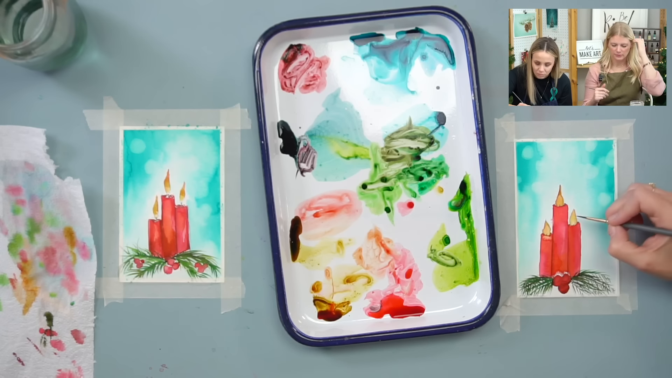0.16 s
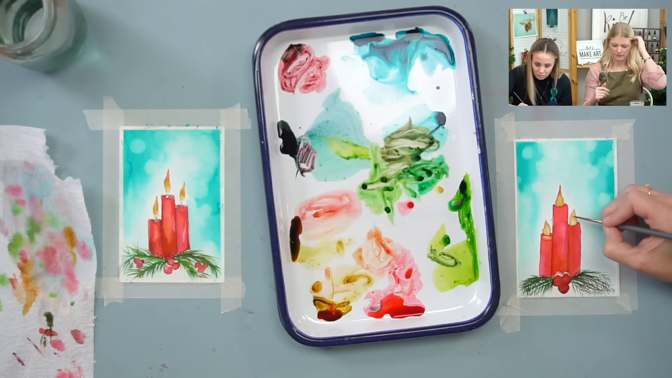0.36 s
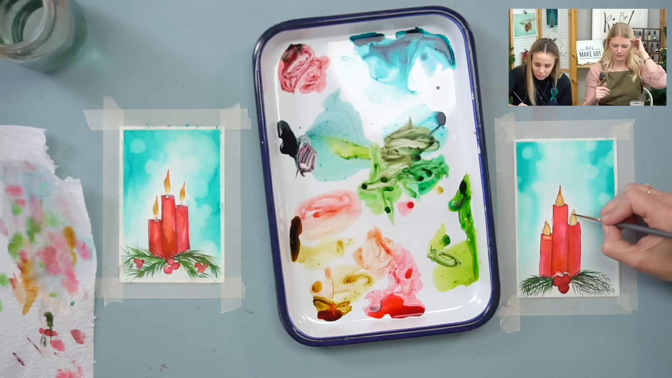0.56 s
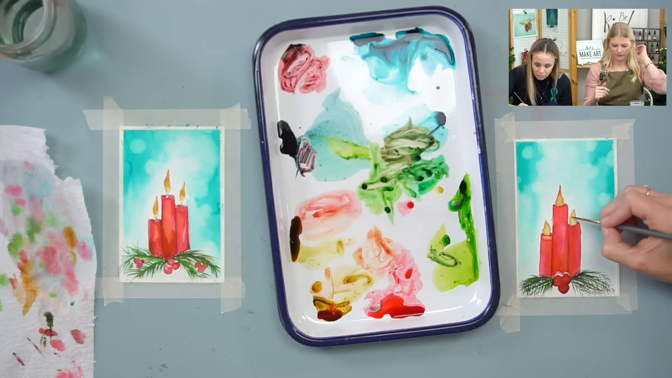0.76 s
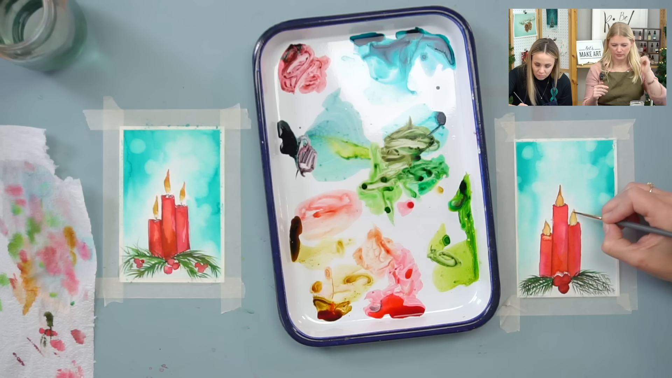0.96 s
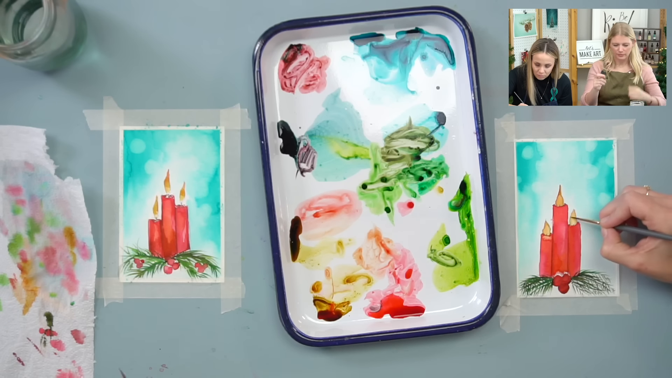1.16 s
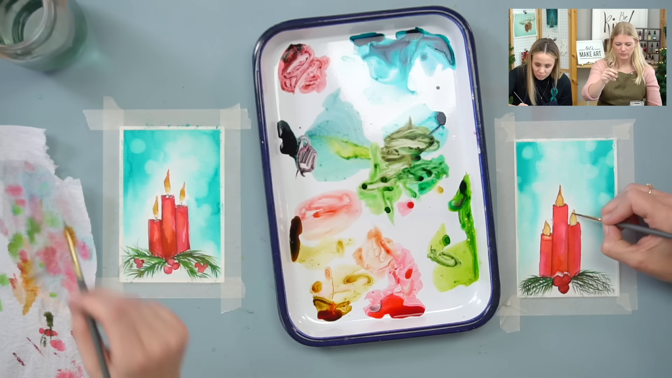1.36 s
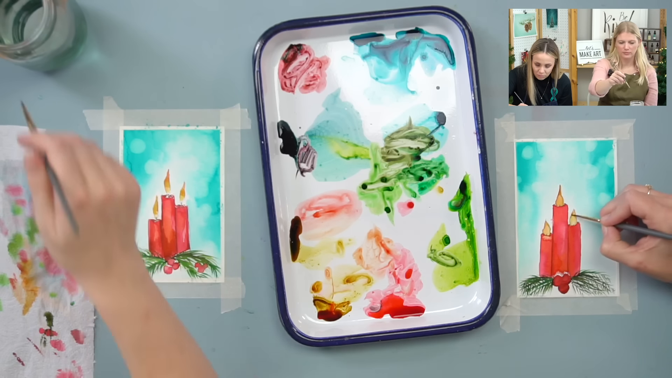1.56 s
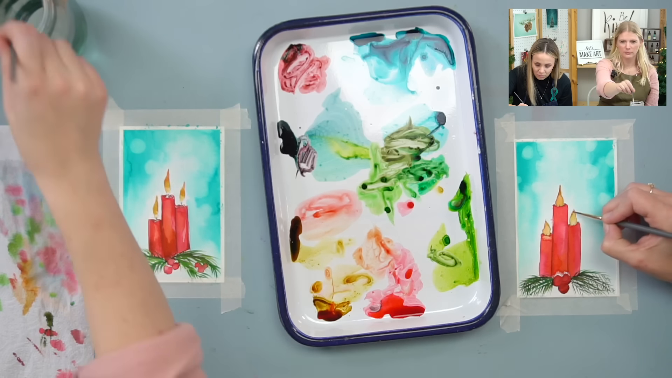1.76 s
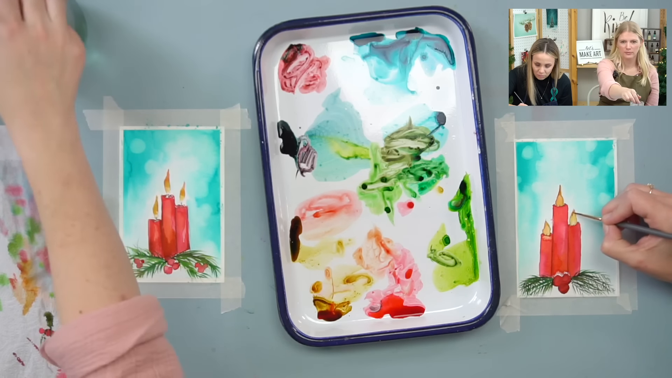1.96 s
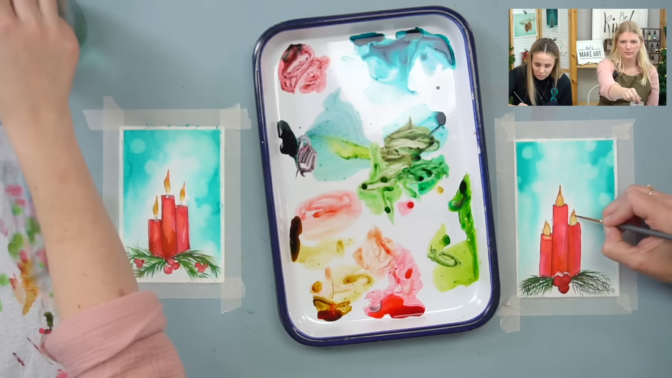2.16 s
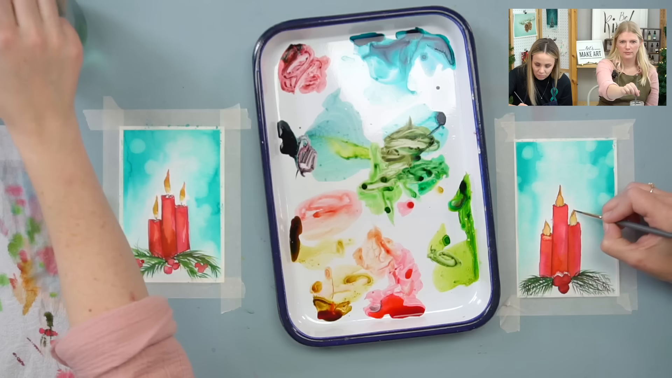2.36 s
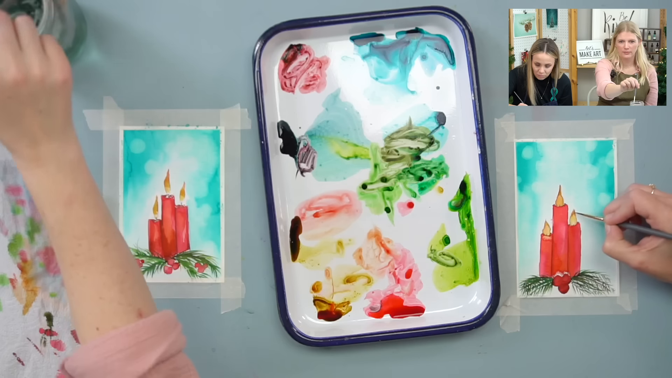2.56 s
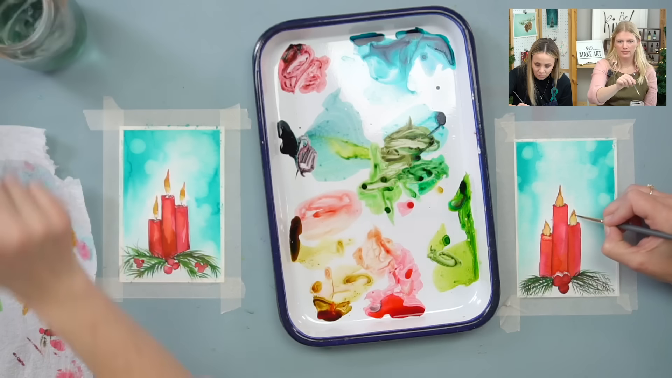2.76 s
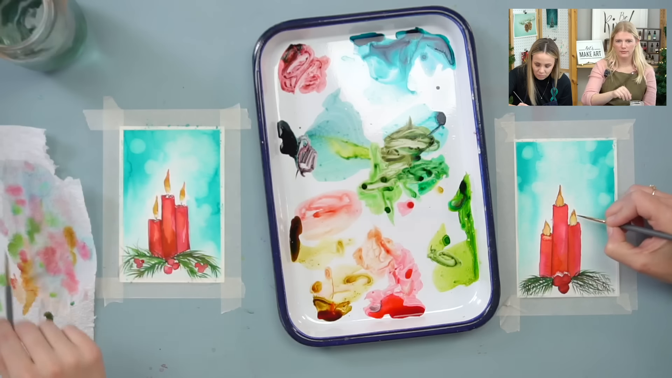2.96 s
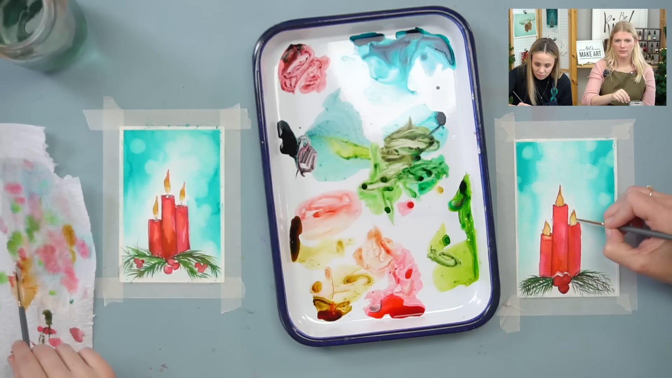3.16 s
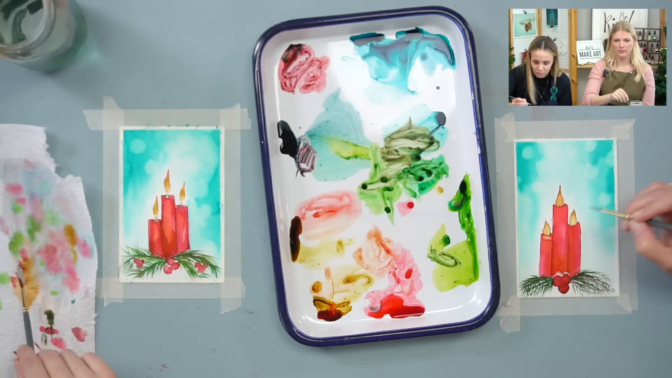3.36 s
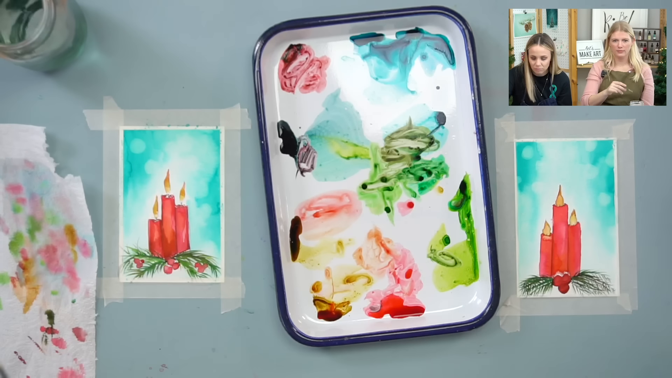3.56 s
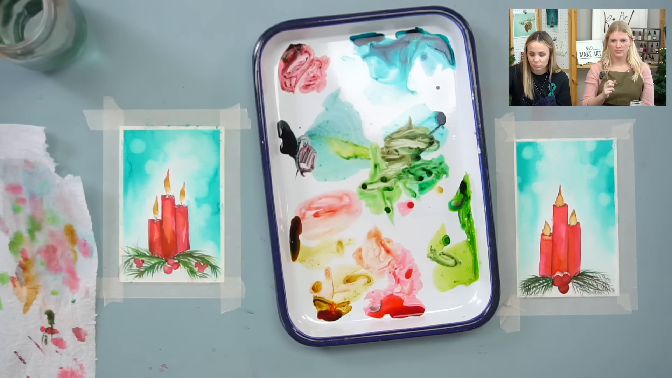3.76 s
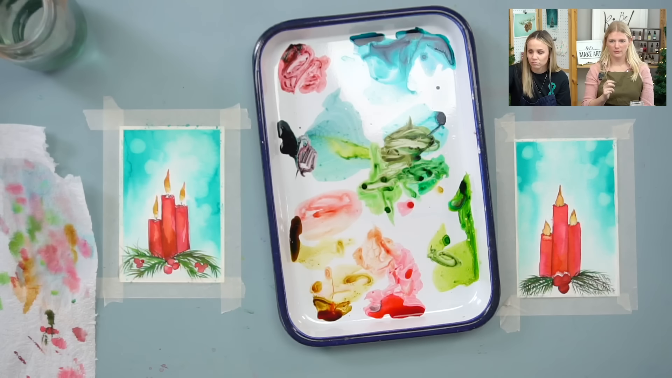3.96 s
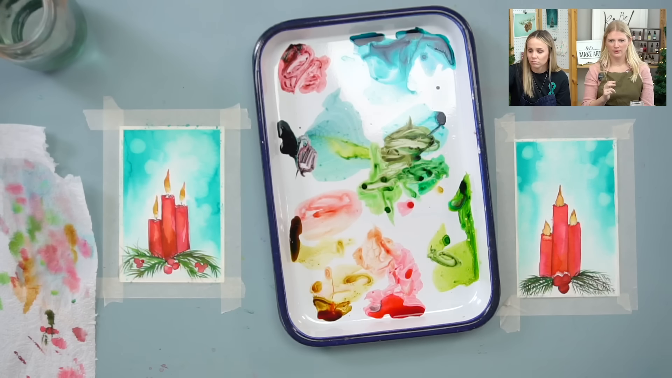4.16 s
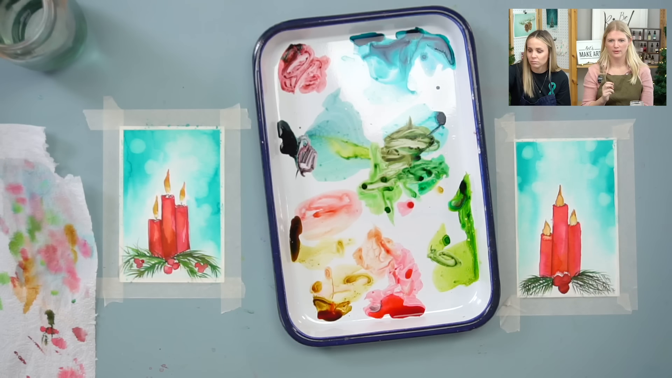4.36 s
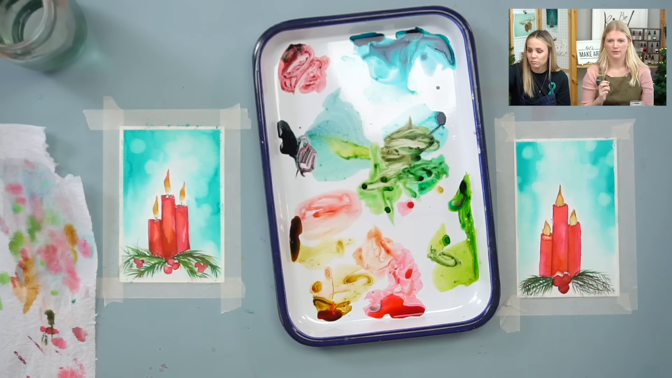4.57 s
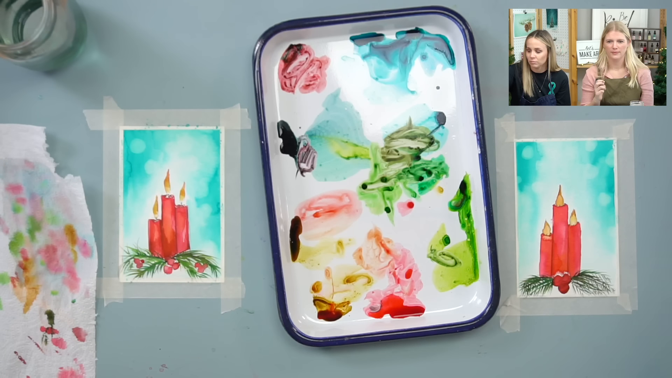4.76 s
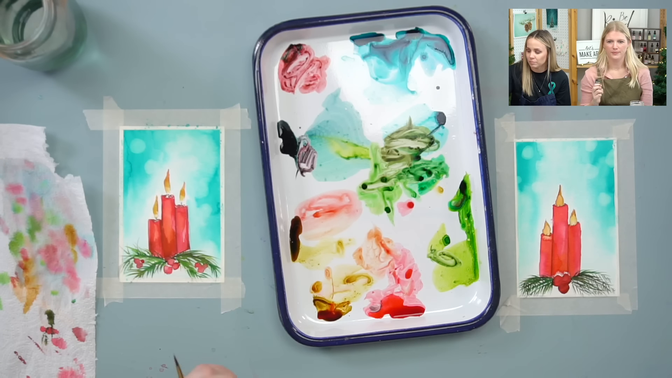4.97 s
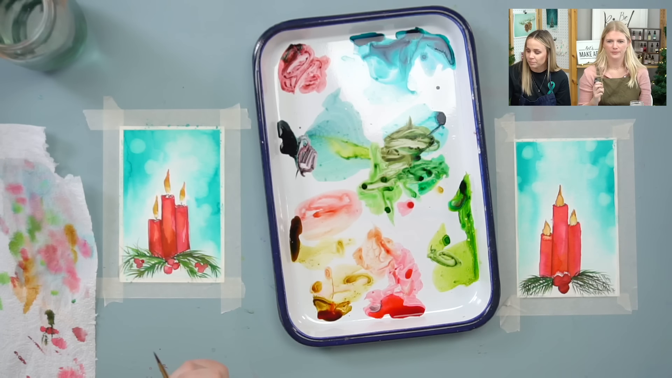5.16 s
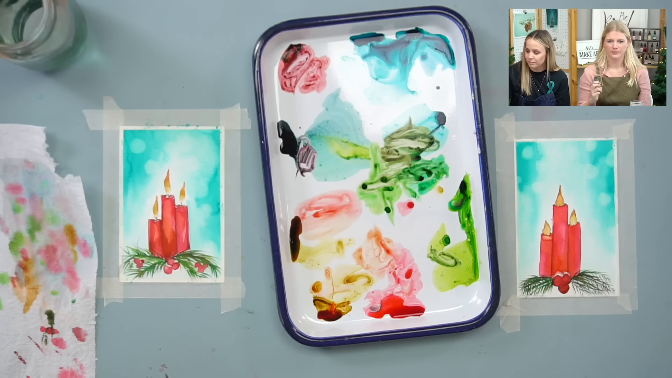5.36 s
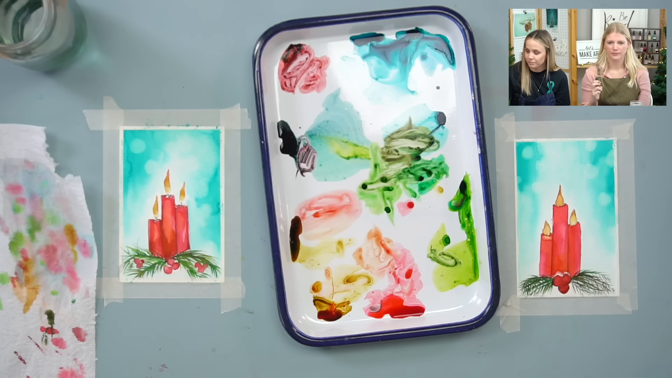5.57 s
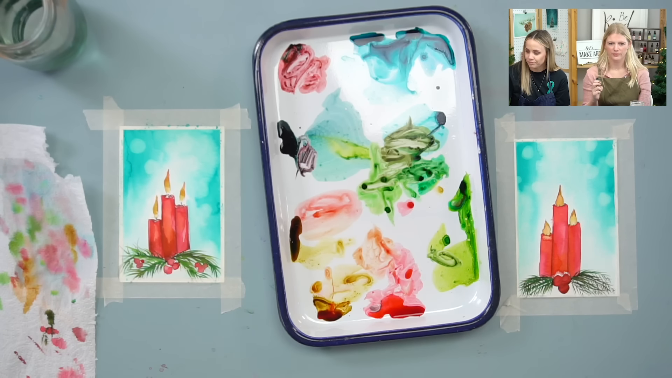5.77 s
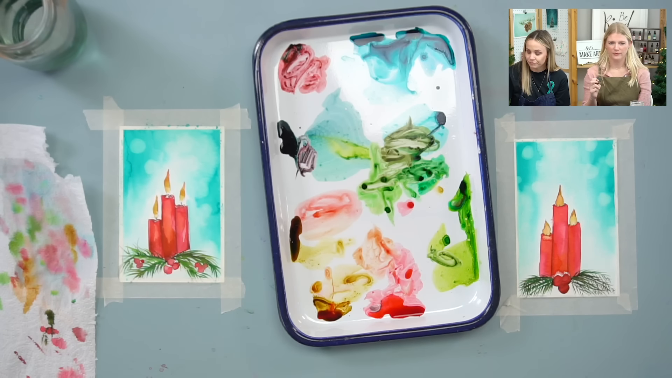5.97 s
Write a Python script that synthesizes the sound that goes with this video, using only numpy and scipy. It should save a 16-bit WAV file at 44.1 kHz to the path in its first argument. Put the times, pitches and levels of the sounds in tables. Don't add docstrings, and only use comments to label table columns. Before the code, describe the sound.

Quiet ventilation hum in a small furnished room. Sleeves and a paper towel rustle, with small crease snaps and low thuds of cloth on a close clip-on microphone. Near two seconds a brush raps a glass water jar three times: a bright rim clink, a duller, wetter knock under water, then another bright clink. More rustles and bumps follow, with a faint little tick later.

```python
import sys
import numpy as np
from scipy import signal
from scipy.fft import rfft, irfft, next_fast_len
from scipy.io import wavfile
from scipy.ndimage import map_coordinates

SR = 44100
rng = np.random.default_rng(int(sys.argv[2]) if len(sys.argv) > 2 else 0)


def invert_db(x):
    u = np.asarray(x, float) / 20
    return 10 ** u


def transcribe(u):
    v = np.clip(np.atleast_2d(u).T, -1, 1)
    q = np.round(v * 32767).astype(np.int16)
    wavfile.write(sys.argv[1], SR, q)


N = 265570

# f/Hz, level/dB
PAPER_SPECTRUM = [(1200, -13), (2500, -3), (4500, -1.5), (7000, -6.5), (11000, -15), (16000, -26)]


def jar_blows():
    rim_hz = [2729, 2815, 2878, 3779, 3953, 4388, 4582, 5265, 5412, 5479, 6300, 7644, 8271, 8360, 8905,
              9038, 9620, 9795, 10690, 10925, 11363, 12089, 12400, 12908, 13200, 13995, 14242, 14688, 15010,
              15710]
    # t60/s, level at first rim blow/dB, level at second rim blow/dB
    rim_rings = [(0.49, -18.5, -30.5), (0.44, -21, -30), (0.34, -36, -33.5), (0.2, -22.5, -31.5),
                 (0.37, -59, -54), (0.25, -18, -33.5), (0.3, -33.5, -45), (0.39, -60, -34),
                 (0.46, -37.5, -29.5), (0.19, -26.5, -18), (0.18, -45, -41), (0.32, -46.5, -47),
                 (0.2, -33.5, -39), (0.13, -29.5, -52), (0.21, -36, -24), (0.11, -20, -20),
                 (0.25, -42, -38), (0.14, -36, -54), (0.22, -48.5, -41), (0.22, -51, -36), (0.19, -60, -35),
                 (0.15, -37, -27), (0.16, -39, -33), (0.1, -41, -38), (0.12, -29.5, -38), (0.15, -59, -44),
                 (0.22, -61, -47), (0.22, -52, -57), (0.19, -61, -45), (0.16, -58, -55)]
    wall_hz = [2765, 3395, 3490, 3885, 3980, 4026, 4674, 5305, 5500, 7235, 7360, 7573, 7813, 8106, 8355,
               8930, 9085, 9800, 10400, 11250, 11400, 12294, 12600, 13050, 14810, 15040, 15365, 15710]
    # t60/s, level/dB
    wall_rings = [(0.33, -35), (0.18, -55), (0.39, -55), (0.25, -45), (0.22, -33), (0.11, -20.5),
                  (0.26, -35.5), (0.16, -38), (0.14, -30), (0.24, -49), (0.17, -29), (0.28, -53),
                  (0.11, -34), (0.215, -48), (0.14, -39), (0.28, -55), (0.19, -37), (0.22, -51),
                  (0.12, -59), (0.14, -44), (0.11, -53), (0.099, -52), (0.21, -58), (0.2, -66), (0.3, -65),
                  (0.22, -58), (0.23, -58), (0.11, -54)]
    # t/s, crack/dB, shimmer/dB, shimmer tilt/dB per octave, flutter/dB, fade curvature/1
    blows = [
        (1.8736, -21.5, -34, 3, 3, 1.2),
        (2.1394, -26, -31, -5, 5.5, 0.95),
        (2.487, -20, -33.5, 7, 6, 0.84),
    ]
    # f/Hz, level/dB
    crack_spectrum = [(600, -34), (1500, -20), (2500, -1.5), (4000, 9.5), (6500, -7), (9000, -7),
                      (13000, -8), (16000, -21)]

    out = np.zeros(N)
    t = np.arange(SR // 2) / SR
    rim = np.column_stack([rim_hz, rim_rings])
    wall = np.column_stack([wall_hz, wall_rings])
    struck = [rim[:, [0, 1, 2]], wall, rim[:, [0, 1, 3]]]
    next_s = [blow[0] for blow in blows[1:]] + [N / SR]
    for modes, blow, end in zip(struck, blows, next_s):
        s, crack_db, shimmer_db, tilt_db, depth_db, bend = blow
        glass = np.zeros(len(t))
        for hz, t60, db in modes:
            glass += ring(hz, db - 1.0, t60, 0.00045, bend) * flutter(depth_db, rate=59.3)
        glass *= invert_db(-60 * np.maximum(t + s - end, 0) / 0.05)
        glass += shimmer(shimmer_db - 13, tilt_db, count=170)
        crack = coloured(rng.standard_normal(len(t)), crack_spectrum)
        glass += invert_db(crack_db - 60 * t / 0.028) * crack
        add(out, s, glass)
        add(out, s, invert_db(-9) * room_tail(glass))
    return out


def flutter(depth_db, rate):
    knots = rng.standard_normal(int(rate / 2) + 4)
    t = np.arange(SR // 2) / SR
    onset = np.tanh(t / 0.0078)
    return invert_db(depth_db * onset * map_coordinates(knots, [t * rate]))


def shimmer(db, tilt_db, count):
    place, size, life = rng.random((count, 3)).T
    hz = 3100 + 12700 * (np.arange(count) + place) / count
    octaves = np.log2(hz / 6000)
    t60 = 0.28 * invert_db(-3.5 * octaves + 4.9 * (life - 1.5))
    gap_db = 8 * np.exp(-((hz - 6500) / 700) ** 2)
    level_db = db + tilt_db * octaves - gap_db - 17 * size
    return sum(ring(*mode, attack=0.00071) for mode in zip(hz, level_db, t60))


def brush_pings():
    # t/s, f/Hz, level/dB, t60/s
    pings = [(2.141, 775, -34, 0.045), (2.158, 770, -29.5, 0.031), (2.16, 1117, -36.5, 0.064),
             (2.487, 823, -32, 0.042), (4.46, 7100, -66, 0.18), (4.469, 1445, -34.5, 0.028),
             (4.471, 4380, -43, .15), (4.4926, 4450, -34, 0.094), (4.493, 5250, -51, .1),
             (2.1398, 3320, -27, 0.04), (2.4872, 3690, -33, 0.033), (2.634, 7500, -46, .01),
             (4.672, 4770, -42, 0.033), (4.678, 4380, -47, 0.055), (4.848, 6030, -37.5, 0.018),
             (1.795, 2750, -50, 0.048), (2.38, 2860, -58, .05), (5.378, 2730, -56, 0.035)]
    out = np.zeros(N)
    for s, hz, db, t60 in pings:
        ping = ring(hz, db, t60, attack=0.00047) * flutter(2.3, rate=220)
        add(out, s, ping)
        add(out, s, invert_db(-17) * room_tail(ping))
    return out


def sleeves_and_towel():
    # t of full speed/s, rise/s, hold/s, fall/s, sleeve rustle/dB
    moves = [(0.0, .1, 0.0092, .12, -57), (1.29, 0.22, 0.15, 0.45, -54.5), (1.9, 0.37, 0.3, 0.35, -55.5),
             (2.651, 0.055, 0.19, 0.29, -48.5), (3.2, .2, 0.22, 0.38, -65), (3.563, 0.12, 0.21, 0.18, -54),
             (4.203, 0.097, 0.18, 0.38, -61), (4.473, 0.13, 0.24, 0.17, -51.5),
             (4.88, 0.075, 0.039, 0.27, -57.5), (5.595, .3, .25, 0.24, -62), (5.98, 0.077, .04, .1, -60)]
    # t/s, fizz/dB
    towel_shifts = [
        (.36, -61),
        (1.7, -64),
        (2.84, -56),
        (5.8, -72),
    ]
    # f/Hz, level/dB per Hz
    sleeve_spectrum = [(300, -35), (550, -2), (1200, -5.5), (2000, -13), (3500, -17), (8000, -35),
                       (16000, -46)]
    rest_db = -67.5
    towel_s = 0.21

    rustle_db = swells(rest_db, moves)
    rustle = invert_db(rustle_db)
    fizz_db = -67.5 + 0.72 * (rustle_db - rest_db)
    fizz = invert_db(swells(fizz_db, [(s, towel_s, 0, towel_s, db) for s, db in towel_shifts]))
    slips = invert_db(1.27 * wobble(30) + 1.5 * wobble(400))
    out = invert_db(1.5) * rustle * coloured(slips * rng.standard_normal(N), sleeve_spectrum)
    out += invert_db(-1.5) * fizz * coloured(slips * rng.standard_normal(N), PAPER_SPECTRUM)
    for hz, db in [(500, 16.2), (1300, 6.8)]:
        happens = rng.random(N) < 60 / SR
        kicks = happens * np.tanh(rng.exponential(size=N) / 2) * 2
        out += invert_db(db) * rustle * signal.fftconvolve(kicks, pop(hz))[:N]
    return out


def crease_snaps():
    # t/s, peak/dB, crackle relative to it/dB
    snaps = [(1.008, -49, -6), (1.082, -52, -1), (1.282, -42, -17), (1.375, -34, -11.5), (1.436, -41, -7),
             (1.456, -33.5, -11), (1.511, -33, -24), (1.584, -43, -15), (1.623, -33, -14.5),
             (2.014, -35, -8), (2.148, -40, -14), (2.379, -36, -16), (2.621, -29, -20), (2.634, -43, -13),
             (2.663, -37, -23), (2.677, -25.5, -22), (2.7, -33, -8), (2.888, -34, -16), (2.92, -39, -9),
             (2.981, -45, -25), (3.179, -48, -19), (3.193, -38.5, -22), (3.697, -36, -23),
             (3.699, -30.5, -26), (3.724, -42, -15), (4.468, -36, -23), (4.571, -32, -20),
             (4.891, -34, -21), (4.938, -40, -13), (5.762, -48, -10.5)]
    out = np.zeros(N)
    t = np.arange(2048) / SR
    for s, db, crackle_db in snaps:
        add(out, s + 0.001025, invert_db(db + 2.5) * pop(1440))
        crackle = coloured(rng.standard_normal(len(t)), PAPER_SPECTRUM)
        add(out, s + 0.000977, invert_db(db + crackle_db - 60 * t / 0.023) * crackle)
    return out


def pop(hz):
    u = 2 * np.pi * hz * np.arange(512) / SR
    return 3 * u ** 2 * (1 - u / 3) * np.exp(-u)


def microphone_bumps():
    # t/s, peak/dB, f/Hz
    bumps = [
        (1.455, -23, 182),
        (1.485, -28, 213),
        (1.547, -27, 310),
        (2.98, -22, 210),
        (3.173, -22, 265),
        (3.694, -22, 360),
        (3.767, -43, 172),
        (4.93, -27.5, 175),
    ]
    out = np.zeros(N)
    for s, db, hz in bumps:
        add(out, s + 0.00312, ring(hz, db - 1, t60=0.017, attack=0.0012))
    return out


def microphone_rub():
    # t/s, rumble/dB
    leans = [
        (0.0, -34),
        (1.38, -37.5),
        (2.87, -36.5),
        (3.7, -39.5),
        (4.65, -46),
        (5.62, -42.5),
    ]
    # f/Hz, level/dB per Hz
    rub_spectrum = [(24, -62), (40, -35), (68, 0), (113, 1.5), (151, 0.5), (593, -10.5), (900, -20),
                    (1170, -32), (1980, -120)]
    lean_s, rest_db = 0.16, -44
    rumble = invert_db(swells(rest_db, [(s, lean_s, 0, lean_s, db) for s, db in leans]))
    grains = invert_db(1.65 * wobble(25)) * rng.standard_normal(N)
    return invert_db(-8.5) * rumble * coloured(grains, rub_spectrum)


def ventilation():
    # f/Hz, level/dB per Hz
    air_spectrum = [(26, -48), (45, -7), (123, 0), (146, -8.5), (177, -9), (296, -5.5), (397, -8),
                    (533, -10), (632, -25), (828, -24.5), (1290, -32.5), (1450, -35.5), (15600, -41)]
    # f/Hz, width/Hz, level/dB
    ducts = [(93, 6.2, -56.5), (119.6, 5.1, -55), (175, 11.3, -54.5), (328.7, 37, -59)]
    out = invert_db(-49.5) * coloured(rng.standard_normal(N), air_spectrum)
    for centre, width, db in ducts:
        hum = filtered(rng.standard_normal(N), lambda hz: 1 / (1 + ((hz - centre) / width) ** 2))
        out += invert_db(db) * unit(hum)
    return out


def room_tail(x):
    # f/Hz, t60/s
    decay = [(300, 0.74), (3000, 0.37), (12000, 0.23)]
    hz, t, z = signal.stft(rng.standard_normal(SR // 2), SR, nperseg=256)
    fade = invert_db(-60 * t / along(decay, hz)[:, None])
    tail = signal.istft(z * fade, SR, nperseg=256)[1]
    late = np.pad(x, (250, 0))
    return signal.fftconvolve(late, tail / np.linalg.norm(tail))


def ring(hz, db, t60, attack, bend=1):
    t = np.arange(SR // 2) / SR
    fade = invert_db(db - 60 * (t / t60) ** bend)
    return fade * np.sin(2 * np.pi * hz * t) * (1 - np.exp(-t / attack))


def swells(rest_db, rows):
    t = np.arange(N) / SR
    power = invert_db(rest_db) ** 2
    for s, rise, hold, fall, db in rows:
        away = np.maximum((s - t) / rise, (t - s - hold) / fall)
        power = power + invert_db(db - 10 * np.maximum(away, 0)) ** 2
    return 10 * np.log10(power)


def wobble(rate):
    knots = rng.standard_normal(int(N * rate / SR) + 4)
    return map_coordinates(knots, [np.arange(N) * rate / SR])


def unit(x):
    return x / np.sqrt(np.mean(x ** 2) + 1e-20)


def along(points, hz):
    f, v = np.transpose(points)
    return np.interp(np.log(hz + 1), np.log(f + 1), v)


def filtered(x, response):
    m = next_fast_len(len(x) + 8192)
    return irfft(rfft(x, m) * response(np.fft.rfftfreq(m, 1 / SR)), m)[:len(x)]


def coloured(x, spectrum):
    return unit(filtered(x, lambda hz: invert_db(along(spectrum, hz))))


def add(track, s, sound):
    part = track[round(s * SR):][:len(sound)]
    part += sound[:len(part)]


def scene():
    brush_and_jar = jar_blows() + brush_pings()
    clothing = sleeves_and_towel() + crease_snaps() + microphone_bumps() + microphone_rub()
    return (brush_and_jar + clothing + ventilation())[None]


def low_pass(x):
    return signal.sosfilt(signal.butter(12, 16320, fs=SR, output="sos"), x)


def record(dry):
    mix = filtered(dry[0], lambda hz: np.clip((15850 - hz) / 200, 0, 1))[None]
    return low_pass(mix)


dry = scene()
out = record(dry)
transcribe(out)
```